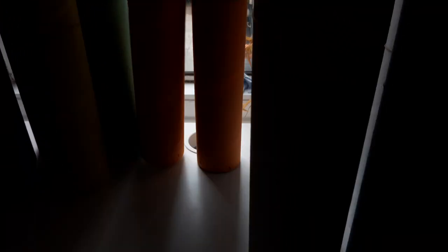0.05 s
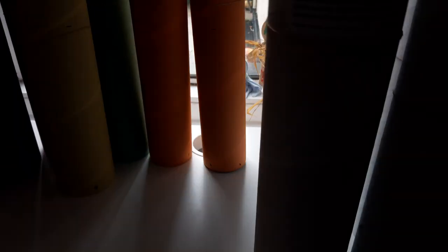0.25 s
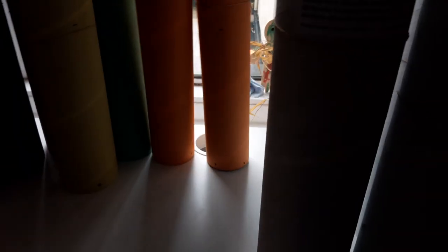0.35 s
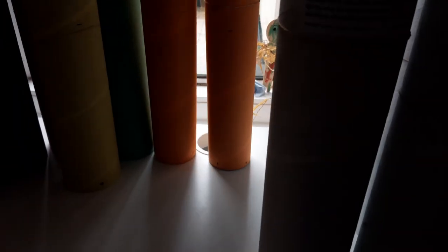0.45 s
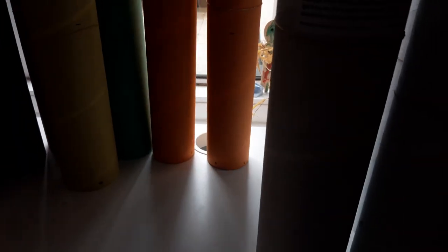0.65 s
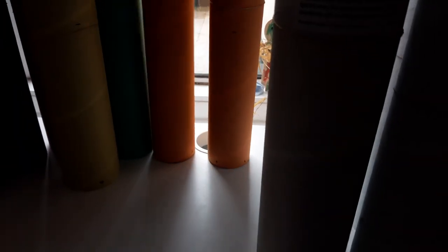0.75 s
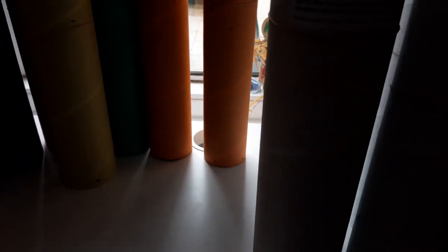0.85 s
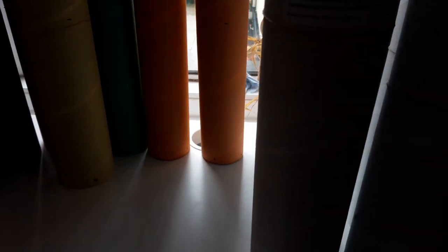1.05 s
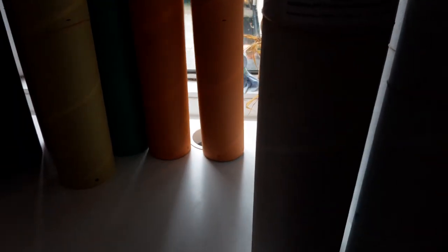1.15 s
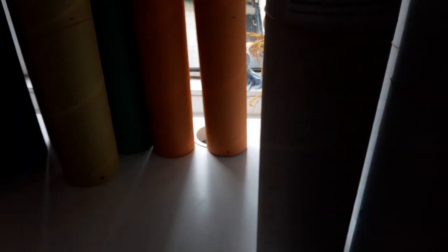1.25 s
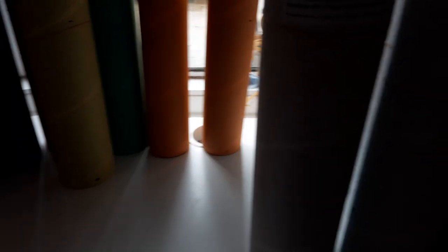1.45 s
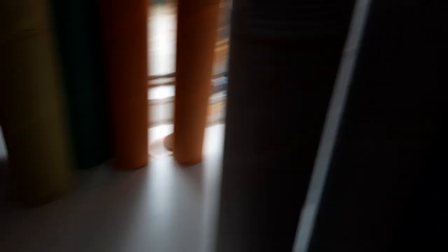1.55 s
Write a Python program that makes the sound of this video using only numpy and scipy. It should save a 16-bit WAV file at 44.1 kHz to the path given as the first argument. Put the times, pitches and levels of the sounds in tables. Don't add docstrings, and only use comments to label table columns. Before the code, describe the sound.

Cardboard tube knock, loud and hollow, followed by faint rustling slides and light clacks on a sill.

```python
import sys
import numpy as np
from scipy import signal
from scipy.fft import rfft, irfft
from scipy.io import wavfile

SR = 44100
rng = np.random.default_rng(int(sys.argv[2]) if len(sys.argv) > 2 else 0)


def master_out(mix):
    frames = np.transpose(np.atleast_2d(mix))
    ceiling = np.clip(frames, -1, 1)
    pcm = np.round(ceiling * 32767).astype(np.int16)
    wavfile.write(sys.argv[1], SR, pcm)


def attenuation_scalar(level_db):
    decades = np.asarray(level_db, float) / 20
    return 10 ** decades


N = 70560
T = np.arange(N) / SR

# f/Hz, level/dB, t60/s
TUBE_MODES = [(130, -4, 0.24), (200, -9, 0.098), (274, -3, 0.055), (312, -7.5, .06), (376, 0.5, 0.059),
              (483, -14, 0.098), (610, -5, 0.028), (740, -12, 0.017), (831, -13, 0.064), (1038, 0, 0.016),
              (1241, -18.5, 0.074), (1400, -17, 0.086), (1660, -27, 0.046), (2450, -27, .015)]
# t/s, level/dB
DRAG_LEVEL = [(0, -30), (.1, -77.5), (.2, -52), (.4, -77.5), (.52, -78), (.565, -73.5), (.6, -63),
              (.72, -74.5), (.77, -67), (.85, -56), (.93, -45.5), (1.05, -58), (1.13, -86), (1.18, -40.5),
              (1.29, -62), (1.34, -72), (1.43, -68.5), (1.6, -75)]
RADIATION_HZ = 100


def rms_one(x):
    return x / np.sqrt(np.mean(x ** 2) + 1e-20)


def cut(x, hz, kind, order=2):
    sos = signal.butter(order, np.clip(hz, 10, SR * .45), kind, fs=SR, output="sos")
    return signal.sosfilt(sos, x)


def shaped(x, points):
    hz, db = np.transpose(points)
    bins_hz = np.arange(N // 2 + 1) * SR / N
    return irfft(rfft(x) * attenuation_scalar(np.interp(np.log(bins_hz + 1), np.log(hz), db)), N)


def coloured(x, points):
    return rms_one(shaped(x, points))


def ring(clicks, hz, t60):
    r, w = attenuation_scalar(-60 / (t60 * SR)), 2 * np.pi * hz / SR
    return signal.lfilter([0, np.sin(w)], [1, -2 * r * np.cos(w), r * r], clicks + 1e-18)


def grains(rate, spread_db):
    sizes = attenuation_scalar(spread_db * np.minimum(rng.exponential(1, N), 5)) * rng.choice([-1, 1], N)
    return rms_one(sizes * (rng.random(N) < rate / SR))


def slides():
    # start t/s, length/s, level/dB, lowest f/Hz, peak at share of length
    strokes = [(-.03, 0.12, -53, 2040, 1), (-.05, .19, -49, 702.6, 0.46), (0.117, 0.29, -50.5, 2040, 0.082),
               (0.121, 0.069, -51.5, 600, 0.62), (0.194, 0.19, -53.5, 1200, .2),
               (0.475, 0.13, -60.5, 4034, 0.56), (.73, 0.089, -63.5, 3500, 0.15),
               (0.811, 0.015, -48, 6500, .2), (0.83, 0.068, -57.5, 2820, 0.37),
               (0.901, 0.18, -63.5, 4890, 0.082), (1.005, 0.15, -53.5, 3200, 0.1),
               (1.149, 0.063, -52, 2510, 0.44), (1.199, .1, -51, 2400, 0.39),
               (1.347, 0.14, -59.5, 3200, 0.59)]
    # f/Hz, level/dB
    rub_colour = [(400, -3.5), (2500, 1), (5100, 0), (8400, -15.5), (10500, -13.5), (13000, -8.5),
                  (16000, -9.5)]
    # f/Hz, width/Hz, level/dB
    card_modes = [(3500, 190, -16.5), (5140, 300, -23.5), (7255, 1100, 3.5), (9600, 1000, -3),
                  (10400, 1200, 5.5)]
    flicker_db = 1.0
    rubbing = grains(9300, spread_db=3)
    card = np.zeros(N)
    for hz, width_hz, db in card_modes:
        card += attenuation_scalar(db) * rms_one(ring(rubbing, hz, 0.73 / width_hz)) * 0.22
    body = rms_one(coloured(rubbing, rub_colour) + card)
    body = body * attenuation_scalar(flicker_db * rms_one(cut(rng.standard_normal(N), 60, "low")))
    out = np.zeros(N)
    for start, length, db, low_hz, peak in strokes:
        top = start + np.clip(peak, .05, .95) * length
        rise_fall = np.interp(T, [start, top, start + length], [0, 1, 0])
        swell = np.sin(np.pi / 2 * rise_fall) ** 1.1
        out += attenuation_scalar(db) * swell * cut(body, low_hz, "high", order=5)
    return out


def drag():
    bumps = rms_one(cut(grains(590, spread_db=2.5), 300, "low", order=1))
    pressure = attenuation_scalar(np.interp(T, *np.transpose(DRAG_LEVEL)))
    tubes = np.zeros(N)
    for k, (hz, db, t60) in enumerate(TUBE_MODES):
        push = np.roll(bumps * attenuation_scalar(db), k * 997) * pressure
        tubes += ring(push, hz, t60 * .7) * 0.0054
    rumble = attenuation_scalar(-12.5) * pressure * rms_one(cut(bumps, 90, "low"))
    return cut(tubes, RADIATION_HZ, "high", order=3) + cut(rumble, 180, "low")


def knocks():
    # t/s, level/dB, favoured f/Hz, spread/octaves
    contacts = [(.001, -30, 130, 0.62), (0.02, -59, 148.7, 0.31), (0.1146, -25, 450, 1.1),
                (0.15, -26, 610, 0.1), (0.152, -32, 238, 0.77), (0.174, -29.5, 130, 0.58),
                (.204, -33, 300, .9), (0.2147, -6, 378, 1.23), (0.2234, -14, 316, 0.37),
                (0.236, -57, 150, 0.37), (.260, -36, 137.3, .8), (.598, -52.5, 138.4, 0.82),
                (0.754, -58, 139.4, 0.66), (.748, -60.5, 972, 0.44), (0.813, -59.5, 200, 1.4),
                (.850, -29, 830, 0.12), (0.851, -38.5, 200, 0.25), (0.9047, -44.5, 278, .7),
                (.89, -50, 850, 0.33), (.914, -45.5, 200, 0.88), (.964, -62.5, 245, 0.82),
                (1.035, -39.5, 236, 0.23), (1.169, -44.5, 430, 1.1), (1.219, -49, 307, 1.54),
                (1.242, -38, 257, 0.49), (1.2429, -33, 1322, 0.22), (1.278, -50, 161, 0.8),
                (1.592, -71.5, 347, 1.6)]
    contact_hz, scatter_db, stagger_s = 1800, 1.5, .0015
    chatter_db, chatter_t60 = -31, 0.043
    s, db, favoured_hz, octaves = np.transpose(contacts)
    luck = rng.standard_normal((len(s), len(TUBE_MODES)))
    out = np.zeros(N)
    for k, (hz, mode_db, t60) in enumerate(TUBE_MODES):
        delay = stagger_s * (k % 3) * (hz > 450)
        at = ((np.maximum(s, 0) + delay) * SR).astype(int)
        off_pitch_db = 4.8 * (np.log2(hz / favoured_hz) / octaves) ** 2
        clicks = np.zeros(N)
        np.add.at(clicks, at, attenuation_scalar(db + mode_db - off_pitch_db + scatter_db * luck[:, k]))
        rattle = attenuation_scalar(chatter_db - 60 * T[:800] / chatter_t60) * rng.standard_normal(800)
        chatter = np.convolve(clicks, rattle)[:N]
        out += (-1) ** ((k + 1) // 3) * ring(clicks + chatter, hz, t60)
    return cut(cut(out, contact_hz, "low", order=1), RADIATION_HZ, "high", order=3)


def cracks():
    # t/s, level/dB, centre f/Hz, t60/s
    snaps = [(0.1119, -29, 3520, 0.083), (0.2172, -34, 2400, 0.086), (0.2239, -38.5, 5060, .07),
             (0.302, -54.5, 4700, 0.049), (0.75, -78, 3000, 0.024), (0.8142, -56, 8060, 0.019),
             (0.8458, -60.5, 8000, 0.034), (0.859, -57, 7100, 0.026), (0.914, -64, 8500, .02),
             (0.9212, -56, 9380, 0.012), (0.939, -84, 4530, 0.0084), (0.961, -71.5, 3000, 0.081),
             (0.9984, -57.5, 8280, 0.0047), (1.05, -57.5, 9000, 0.01), (1.171, -43, 4510, 0.016),
             (1.2188, -49, 5150, 0.023), (1.2394, -43, 3300, 0.01)]
    # f/Hz, level/dB, t60/s
    rim_modes = [(2860, 3, 0.0067), (3200, 0.5, 0.011), (4264, -7, 0.023), (4573, 2, 0.0067),
                 (5590, -14.5, 0.034), (8000, -8, 0.0084)]
    half_band = 2 ** (1.006 / 2)
    plain, noise = np.zeros(N), rng.standard_normal(N)
    for s, db, hz, t60 in snaps:
        burst = noise * (T >= s) * attenuation_scalar(-60 * np.maximum(T - s, 0) / t60)
        plain += attenuation_scalar(db + 11.5) * cut(burst, [hz / half_band, hz * half_band], "band", order=1)
    rims = np.zeros(N)
    for k, (hz, db, t60) in enumerate(rim_modes):
        rims += (-1) ** k * attenuation_scalar(db) * ring(plain, hz, t60)
    return plain + attenuation_scalar(-25.5) * rims


def thumps():
    # t/s, level/dB, f/Hz, t60/s
    blows = [
        (0.549, -55, 70, 0.1),
        (.77, -62.5, 74.4, 0.096),
        (1.585, -61, 69, 0.16),
    ]
    out = np.zeros(N)
    for s, db, hz, t60 in blows:
        click = attenuation_scalar(db) * (np.arange(N) == int(s * SR))
        out += ring(click, hz, t60)
    return cut(out, 180, "low")


def room(x):
    t, noise = T[:SR // 2], rng.standard_normal(SR // 2)
    rise = np.clip(t / 0.005 - 1, 0, 1)
    tail = np.zeros(SR // 2)
    for kind, db, t60 in (("low", -5 - 11, .25), ("high", -9.5, 0.1)):
        band = rise * cut(noise, 2200, kind) * attenuation_scalar(-60 * t / t60)
        tail += attenuation_scalar(db) * band / np.sqrt(np.sum(band ** 2))
    return signal.fftconvolve(x, tail)[:N]


def quiet_floor():
    # f/Hz, level/dB
    hush_colour = [(18, -34), (30, -8.5), (138, -4), (199, -19), (649, -18), (721, -20.5), (1540, -22),
                   (5740, -27.5), (16000, -29.5)]
    return attenuation_scalar(-76) * coloured(rng.standard_normal(N), hush_colour)


def scene():
    # f/Hz, level/dB
    mic_response = [(1500, 1.5), (2050, -4), (2500, -3), (11300, -2), (11900, -7.5), (16000, -1)]
    near = slides() + drag() + knocks() + cracks() + thumps()
    return (shaped(near + room(near), mic_response) + quiet_floor())[None]


def top_cut(x):
    return signal.sosfilt(signal.butter(12, 16500, fs=SR, output="sos"), x)


def record(dry):
    rolled_off = cut(dry, 35, "high")
    mix = signal.sosfilt(signal.cheby2(12, 50, 16800, fs=SR, output="sos"), rolled_off)
    return top_cut(mix)


dry = scene()
out = record(dry)
master_out(out)
```